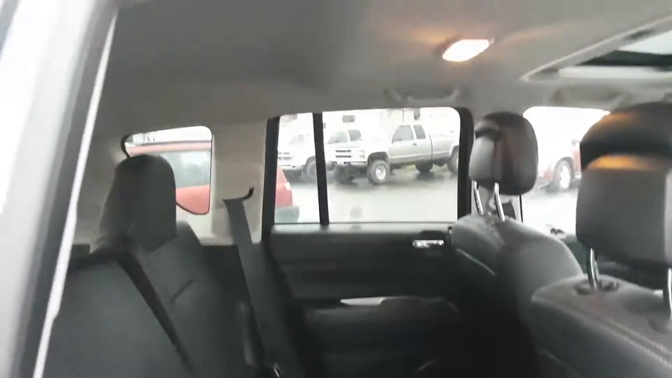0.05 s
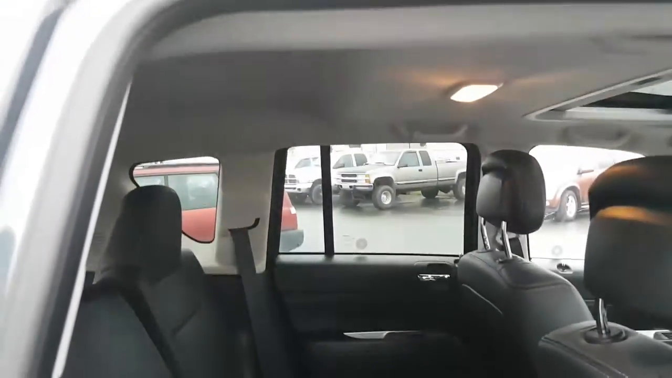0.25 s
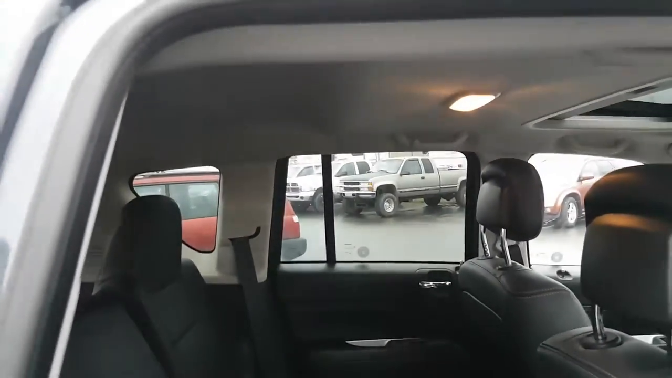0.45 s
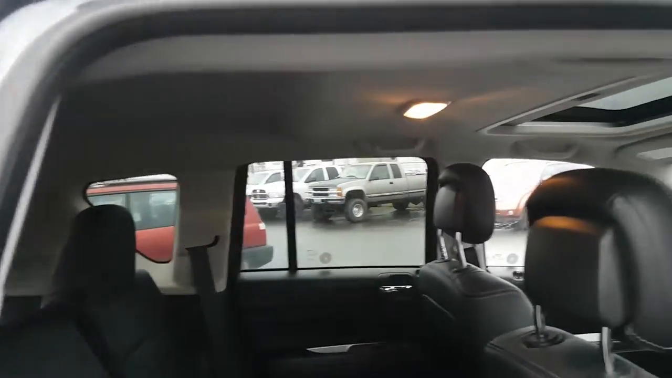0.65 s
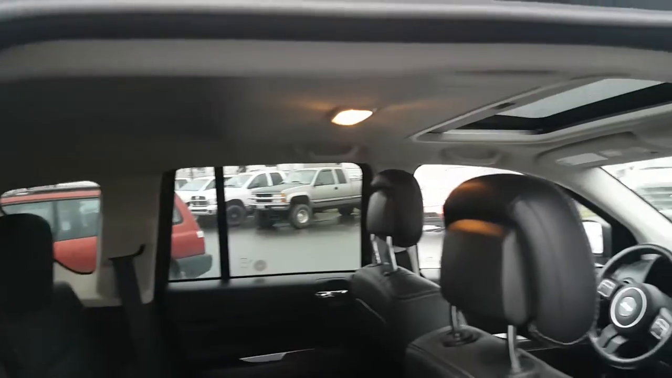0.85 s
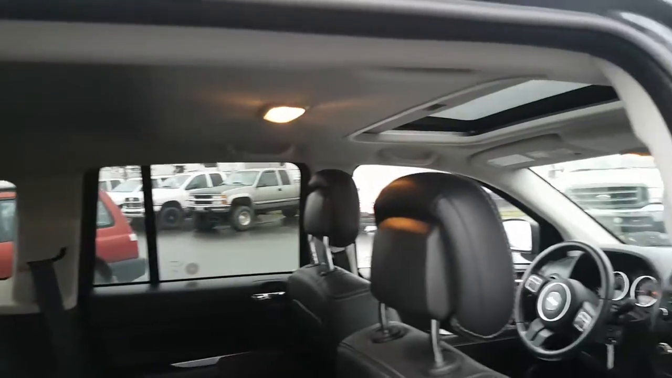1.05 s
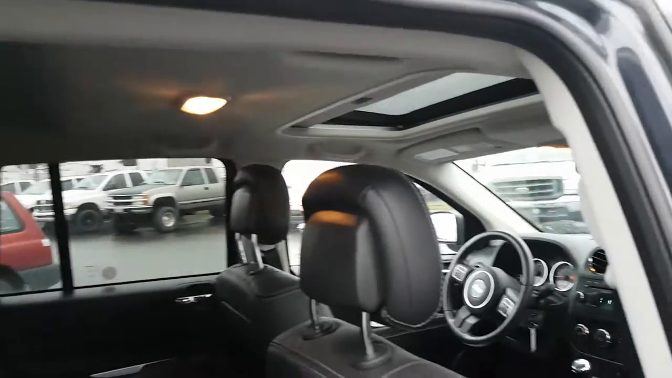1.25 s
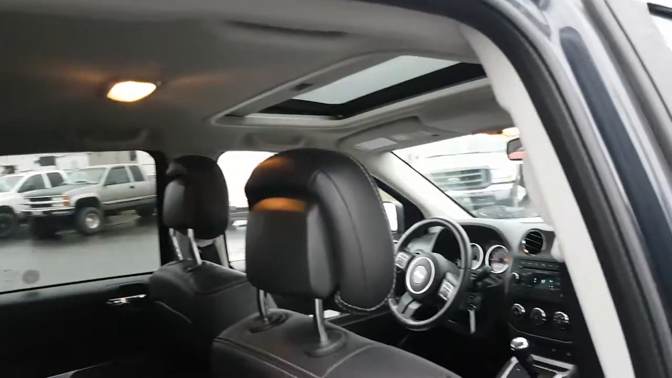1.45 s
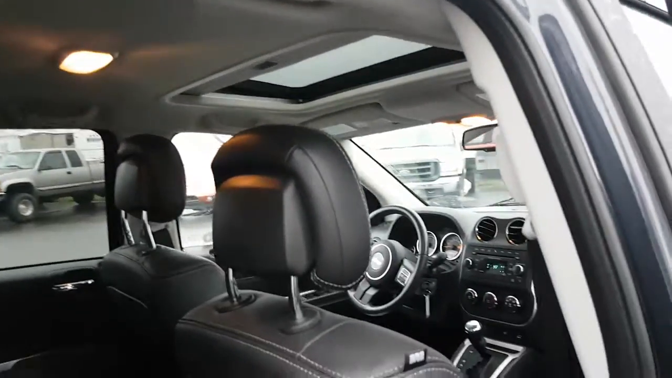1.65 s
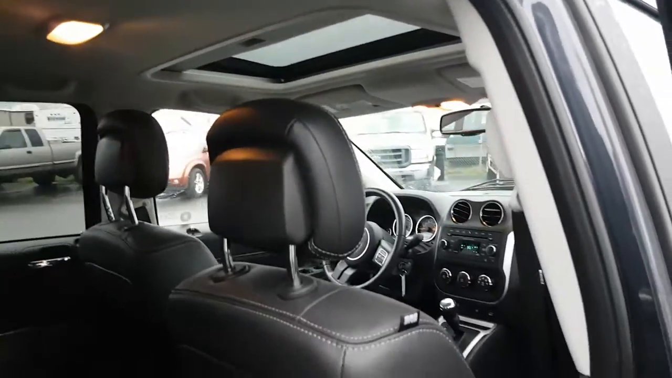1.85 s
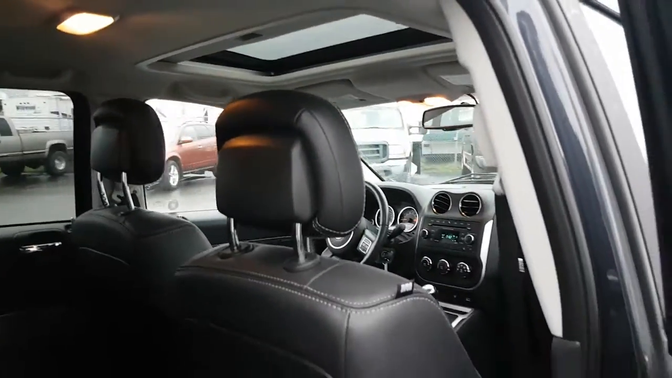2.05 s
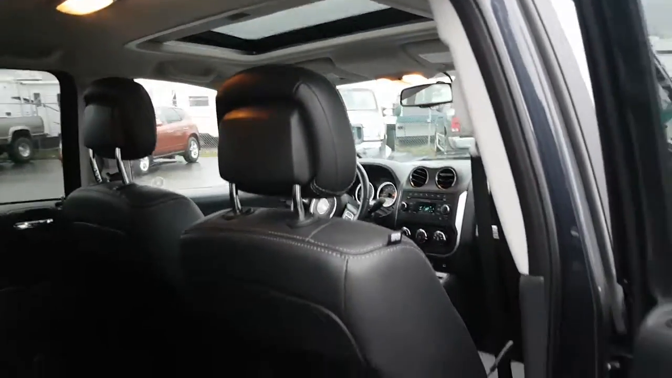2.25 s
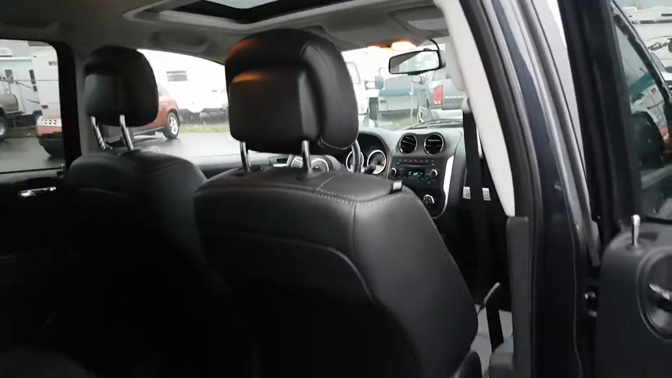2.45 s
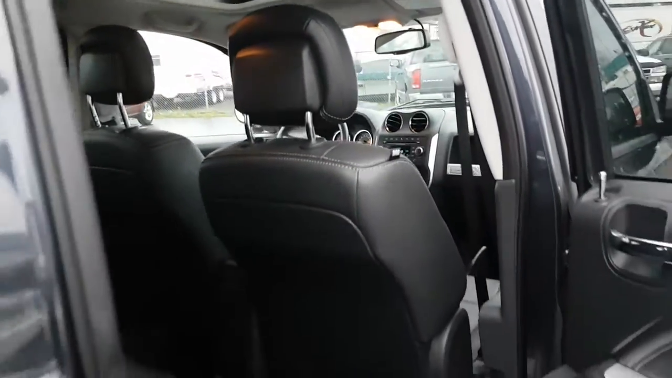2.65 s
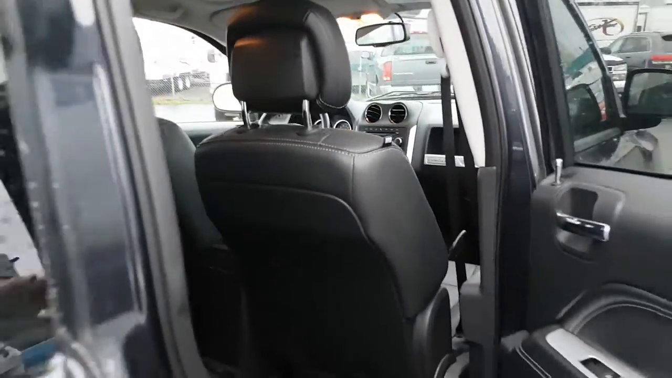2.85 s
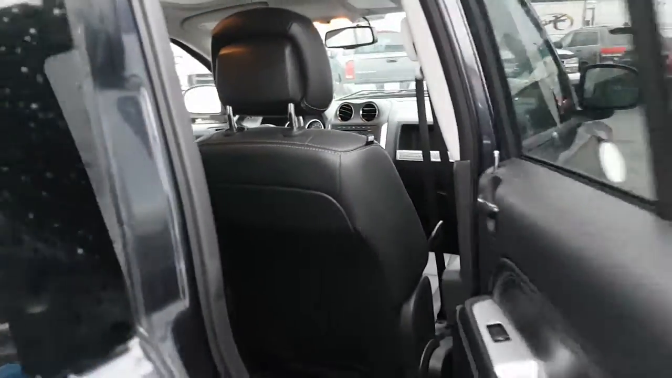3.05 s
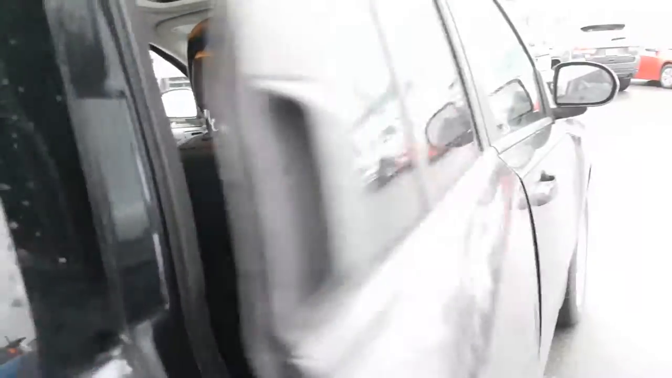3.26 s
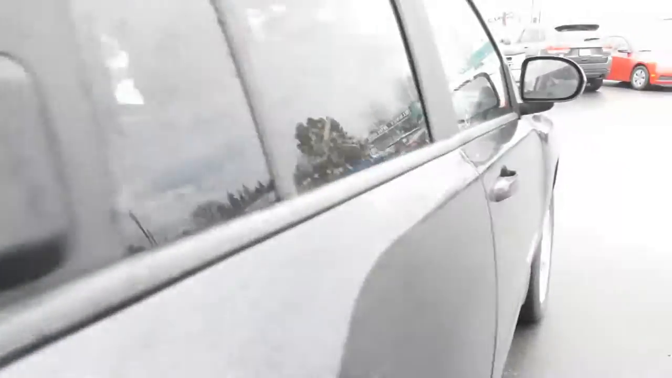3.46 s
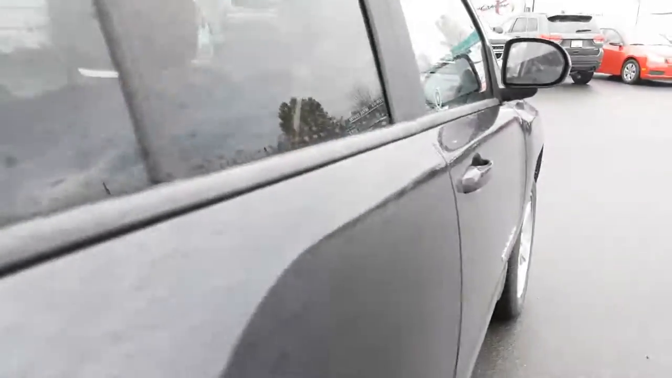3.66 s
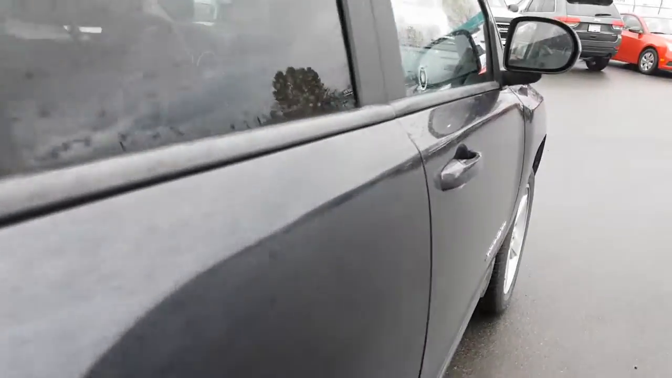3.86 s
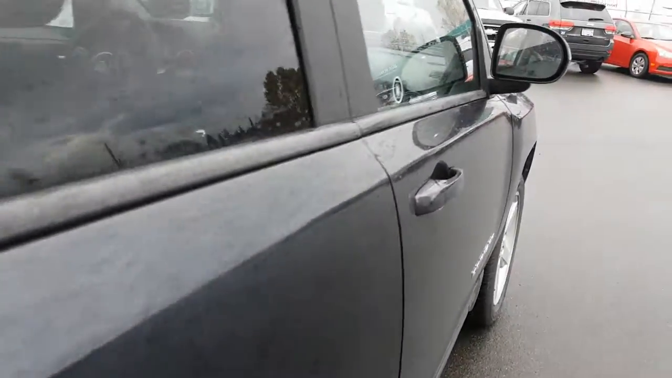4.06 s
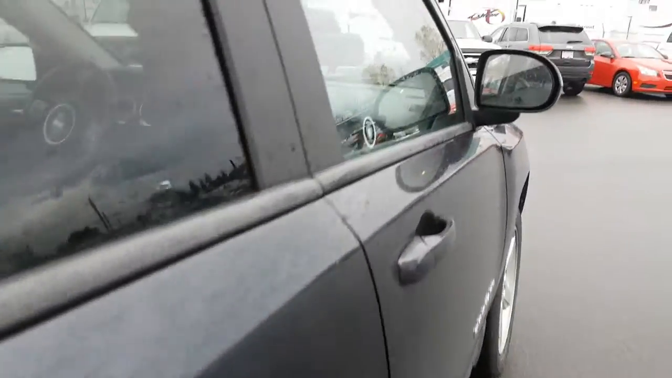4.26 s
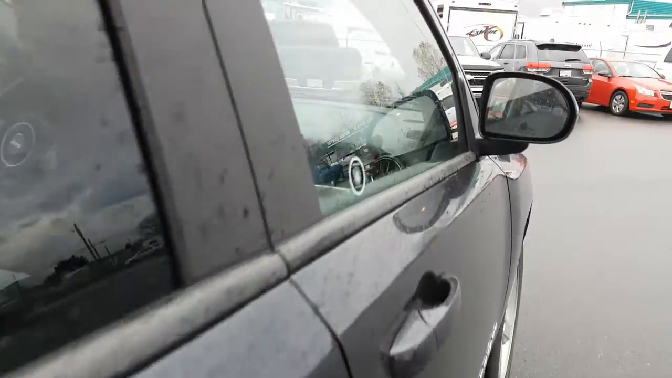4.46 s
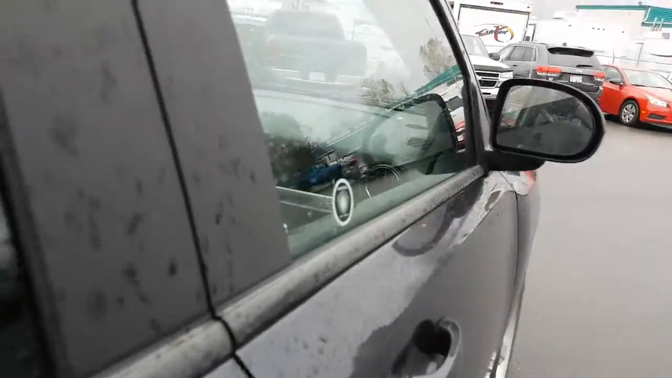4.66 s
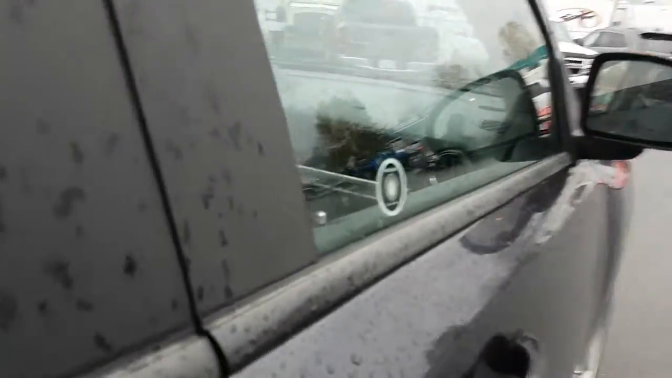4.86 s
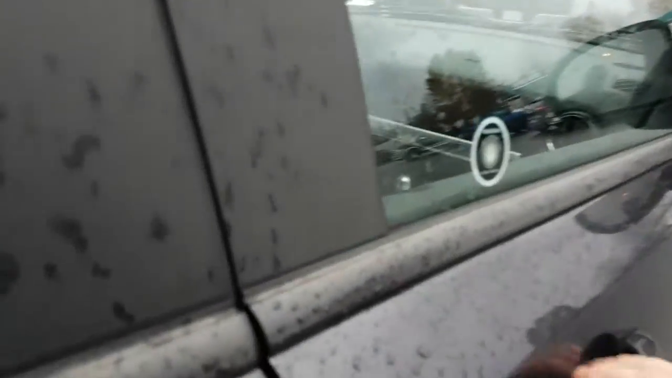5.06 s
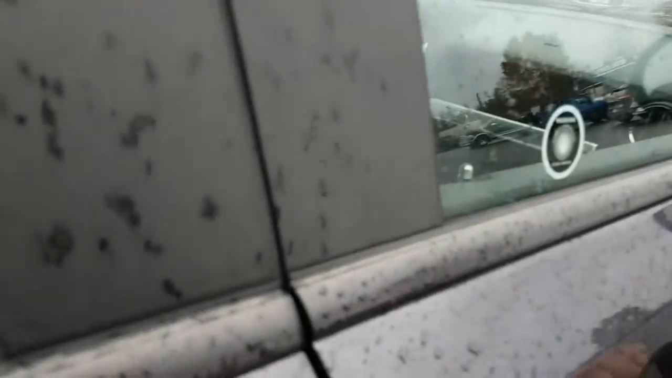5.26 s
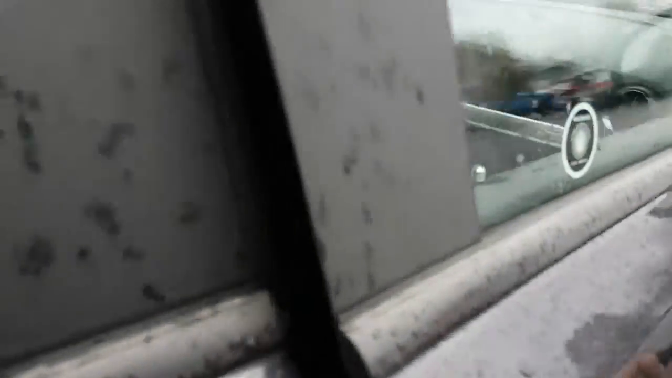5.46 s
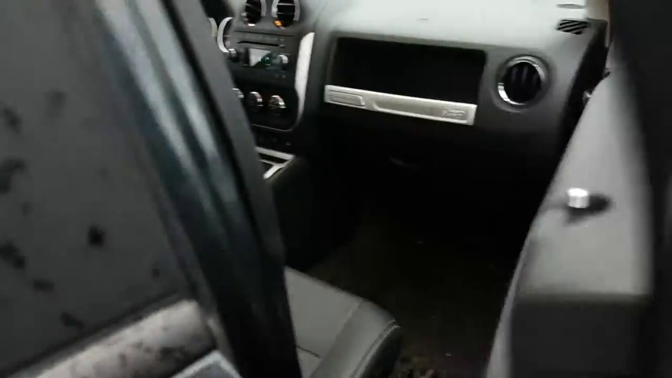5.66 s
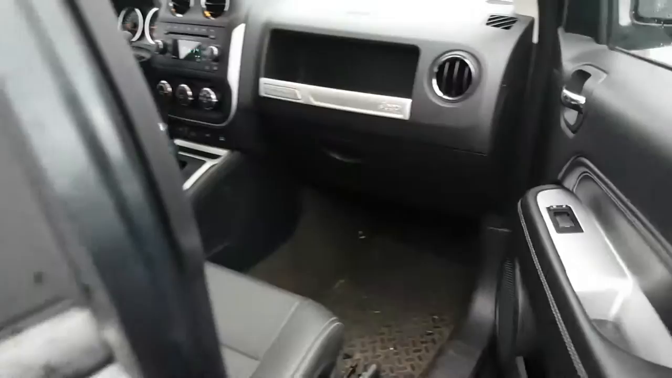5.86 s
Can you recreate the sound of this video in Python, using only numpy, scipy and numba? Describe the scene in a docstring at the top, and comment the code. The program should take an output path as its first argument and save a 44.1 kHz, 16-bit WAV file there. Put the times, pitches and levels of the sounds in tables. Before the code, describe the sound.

In a wet parking lot, faint engines and tyres murmur far off while light scuffs and ticks sound close by. A car door's hinge knocks dully, and the door slams with a loud, booming thump. After a brief bright rasp, another door's handle is pulled and its latch clunks open. Fingers bump the hand-held microphone at the end.

```python
"""A car's rear door is swung shut on a wet parking lot, an arm's length from a hand-held phone; then the
front door's handle is pulled and its latch springs open. Each blow booms in the body, rings the steel
skin and snaps the latch. Engines and tyres murmur far off and the open cabin hums. There are gritty
scuffs, short ticks and one bright double rasp like a lock or keys. Fingers bump the phone, and the slam
ducks the phone's gain."""
import sys
import numpy as np
from scipy import signal
from scipy.fft import rfft, irfft, next_fast_len
from scipy.io import wavfile
from scipy.ndimage import minimum_filter1d
from numba import njit

SR = 44100
rng = np.random.default_rng(int(sys.argv[2]) if len(sys.argv) > 2 else 0)


def generate_wav(signal):
    """Clip the signal to [-1, 1] and save it as 16-bit WAV at the path in sys.argv[1]."""
    frames = np.transpose(np.atleast_2d(signal))
    scaled = np.clip(frames, -1, 1) * 32767
    pcm = np.round(scaled).astype(np.int16)
    wavfile.write(sys.argv[1], SR, pcm)


N = 260471
SCENE_S = np.arange(N) / SR
RING_S = np.arange(int(0.45 * SR)) / SR  # time axis of one event


def undb(db):
    """Decibels to gain."""
    return 10 ** (np.asarray(db) / 20)


def unit(x):
    """Scale to rms 1."""
    return x / np.sqrt(np.mean(x ** 2))


def along(points, hz):
    """Read (f/Hz, value) points on a log-frequency axis."""
    f, value = np.transpose(points)
    return np.interp(np.log(hz + 1), np.log(f), value)


def bins(size):
    """FFT bin frequencies in Hz."""
    return np.fft.rfftfreq(size, 1 / SR)


def add(out, start_s, x):
    """Mix x in from start_s."""
    i = int(start_s * SR)
    out[:, i:i + x.shape[-1]] += x[..., :max(N - i, 0)]


def fade(t60_s):
    """Free decay, 60 dB down at t60_s."""
    return np.exp(-np.log(1000) * RING_S / t60_s)


def noise_pair(size, correlation):
    """White noise spectra at the two microphone ports."""
    mid, side = rfft(rng.standard_normal((2, size)))
    correlation = np.clip(correlation, -1, 1)
    return np.sqrt(1 + correlation) * mid + np.sqrt(1 - correlation) * side * np.array([[1], [-1]])


def band(spectrum, hz, half_oct, size):
    """Sound of a spectrum within half_oct either side of hz, rms 1."""
    ratio = (bins(size) + 1) / hz
    offset = (ratio - 1 / ratio) / (2 ** half_oct - 2 ** -half_oct)
    return unit(irfft(spectrum / np.sqrt(1 + offset ** 6), size))


def lot():
    """Distant engines and wet tyres; the bass is alike at both ports."""
    # background spectrum: f/Hz, relative density/dB
    colour = [(22, -27), (38, -16.5), (62, -1), (100, 0.5), (160, -4), (300, -9.5), (430, -14), (620, -13),
              (900, -18.5), (1800, -20), (2900, -25.5), (4400, -25), (6000, -39), (9000, -49), (15500, -46)]
    # from rear door to front, before offset and flutter: t/s, rumble/dB, tyre wash/dB, hiss/dB
    levels = [(0, -50, -60, -64.5), (1.2, -47.5, -55.5, -65.5), (2.6, -48.5, -57, -64.5),
              (3.3, -44, -55.5, -63.5), (4.55, -47, -56.5, -65.5), (5, -44, -53, -61.5),
              (5.8, -41.5, -57.5, -62.5)]
    times_s, *tracks_db = np.transpose(levels)
    size = next_fast_len(N, True)
    hz = bins(size)
    spectrum = noise_pair(size, 1.015 / (1 + (hz / 560) ** 2)) * undb(along(colour, hz))
    rumble = 1 / (1 + (hz / 450) ** 4)
    hiss = 1 - 1 / (1 + (hz / 2800) ** 6)
    shares = rumble, 1 - rumble - hiss, hiss
    out = 0
    for share, db, offset_db, flutter_db in zip(shares, tracks_db, (3, 4, 6), (1.5, 0.7, 0.4)):
        flutter = np.interp(SCENE_S * 14, np.arange(400), rng.standard_normal(400))  # 14 draws/s
        gain = undb(np.interp(SCENE_S, times_s, db) + offset_db + flutter_db * flutter)
        out += gain * unit(irfft(spectrum * share, size)[:, :N])
    return out


def cabin(hz=582, width_hz=134):
    """The open cabin resonates with outside noise until the phone is drawn back."""
    # hollow hum: t/s, level/dB
    levels = [(0, -55.5), (.5, -57), (1, -73), (1.5, -57), (2, -55), (2.4, -58.5), (2.9, -77)]
    size = next_fast_len(N, True)
    hum = band(noise_pair(size, 0.69), hz, np.log2(1 + width_hz / hz / 2), size)[:, :N]
    return hum * undb(np.interp(SCENE_S, *np.transpose(levels)))


def scuffs(grain_db=5, grains_per_s=1100, light_hz=3500):
    """Gritty scuffs and short ticks, with one bright double rasp like a lock or keys."""
    # scuffs, ticks and rasp: t/s, length/s, level/dB, centre f/Hz
    strokes = [(0.848, 0.043, -47.5, 2200), (0.907, 0.014, -43.5, 3100), (0.924, 0.029, -46, 3780),
               (1.054, .02, -53, 3200), (1.311, 0.016, -40.5, 1140), (1.496, 0.014, -54.5, 4760),
               (1.619, 0.033, -42, 1090), (1.68, 0.08, -43.5, 2330), (1.699, 0.012, -37, 2900),
               (2.062, 0.042, -48, 1800), (2.227, 0.054, -43.5, 3630), (2.32, 0.032, -50.5, 3950),
               (2.786, .06, -45, 3060), (2.865, 0.042, -43, 3400), (3.156, 0.034, -50, 4230),
               (4.303, .028, -43.5, 3480), (4.383, .037, -42.5, 3450), (4.801, 0.032, -37, 3320),
               (4.802, 0.059, -46.5, 10800), (4.826, 0.031, -38, 4050), (4.975, .15, -54, 3640),
               (5.099, .007, -53, 4500), (5.33, .05, -44, 2200), (5.716, 0.049, -53, 4160),
               (5.895, 0.055, -33.5, 1220)]
    out = np.zeros((2, N))
    size = len(RING_S)
    grain_index = (RING_S * grains_per_s).astype(int)
    for start_s, length_s, db, hz in strokes:
        half_oct = np.clip(0.38 + 0.85 * np.log2(light_hz / hz), 0.38, 1.11)  # wider below light_hz
        grains = undb(grain_db * np.clip(rng.standard_normal(size), -2, 2))[grain_index]
        grit = irfft(noise_pair(size, 0.25), size) * grains
        swell = np.sin(np.pi * np.minimum(RING_S / length_s, 1) ** 0.6)  # fast bite, slower release
        add(out, start_s, undb(db) * band(rfft(grit), hz, half_oct, size) * swell)
    return out


def thud(hz, t60_s, blur_db, crowded_hz=660):
    """Heavily damped resonance; above crowded_hz its tone gives way to a blur of close modes."""
    size = len(RING_S)
    tone = np.sin(2 * np.pi * hz * RING_S) / (1 + (hz / crowded_hz) ** 2)
    blur = band(rfft(rng.standard_normal(size)), hz, half_oct=0.48, size=size)
    onset = 1 - np.exp(-RING_S * hz / 0.11)
    return (tone + undb(blur_db) * blur) * onset * fade(t60_s)


def knocks():
    """Hinge stays drop off notches, the handle hits its stop, doors sway, feet land."""
    # dull knocks: t/s, f/Hz, level/dB
    hits = [(3.048, 528, -28.5), (3.056, 139, -29.5), (3.105, 84, -29), (3.129, 47.2, -26.5),
            (3.149, 122, -34), (4.44, 43.9, -41.5), (5.111, 134, -37), (5.358, 339, -15), (5.403, 440, -19),
            (5.408, 211, -16), (5.408, 1030, -13.5), (5.43, 90, -19.5), (5.5113, 607, -26),
            (5.5107, 950, -29), (5.61, 173, -37), (5.648, 970, -26.5)]
    out = np.zeros((2, N))
    for start_s, hz, db in hits:
        add(out, start_s, undb(db) * thud(hz, t60_s=0.21 * (130 / hz) ** 0.68, blur_db=-3))
    return out


def mode_ring(modes, t60_scale, scatter_db, detune):
    """Damped modes, neighbours in antiphase; level and pitch vary with the spot struck."""
    hz, db, t60_s = np.transpose(modes)[:, :, None]
    level_draw, pitch_draw = rng.standard_normal((2, len(modes), 1))
    tones = np.sin(2 * np.pi * hz * (1 + detune * pitch_draw) * RING_S)
    swings = undb(db + scatter_db * level_draw) * tones * fade(t60_scale * t60_s)
    return swings[::2].sum(0) - swings[1::2].sum(0)


def dense_ring(colour, decay, t60_scale, correlation):
    """Countless close modes as noise, each octave dying at its own rate."""
    size, lowest_hz = len(RING_S), 31.25
    spectrum = noise_pair(size, correlation) * undb(along(colour, bins(size)))
    spectrum /= irfft(spectrum, size).std()
    place_oct = np.log2(np.clip(bins(size), lowest_hz, 16000) / lowest_hz)
    out = 0
    for k in range(10):
        octave = irfft(spectrum * np.maximum(1 - abs(place_oct - k), 0), size)
        out += octave * fade(t60_scale * along(decay, lowest_hz * 2 ** k))
    return out


def soften(x, cutoff_hz):
    """Low-pass: a contact of finite length excites little above its cut-off."""
    return signal.sosfilt(signal.butter(2, min(cutoff_hz, SR / 3), fs=SR, output="sos"), x)


def steel_skin(t60_scale):
    """The struck skin rings, along with trim, glass and linkages."""
    # skin modes: f/Hz, relative level/dB, unscaled t60/s
    modes = [(240.2, -2.5, 0.24), (301.5, 0.5, 0.22), (423, -11, .16), (540, -13, 0.31),
             (648.4, -8.5, 0.077), (804, -11, 0.14), (870.6, -6.5, 0.22), (950, -18, 0.17),
             (1054, -0.5, 0.13), (1183, -5.5, 0.2), (1434, -9, 0.095), (1516, -6.5, 0.12), (1576, 1, .13),
             (1760, -7.5, 0.15), (2040, -8, 0.14), (2410, -2, 0.076)]
    # trim spectrum: f/Hz, relative density/dB
    trim_colour = [(60, -24), (200, -2.5), (450, -2.5), (900, 3), (1600, -4.5), (3000, -14.5), (6000, -14),
                   (15000, -35.5)]
    # trim decay: f/Hz, unscaled t60/s
    trim_decay = [(100, 0.6), (500, 0.13), (1500, 0.077), (4000, 0.27), (15000, 0.069)]
    panel = mode_ring(modes, t60_scale, scatter_db=0.5, detune=0.0016)
    trim = dense_ring(trim_colour, trim_decay, t60_scale, correlation=0.78)
    return undb(-7) * panel + undb(-1) * trim


def latch_snap(t60_scale, crack_s=0.00099, rise_s=0.0012):
    """Metal on metal: a hard crack, then the linkage rings on."""
    # snap spectrum: f/Hz, relative density/dB
    colour = [(300, -19), (1200, -2.5), (2500, -3), (4200, 1.5), (5500, -2.5), (7400, -6), (8600, -14),
              (10300, -6), (13000, -7.5), (15500, -15.5)]
    # snap decay: f/Hz, unscaled t60/s
    decay = [(1000, 0.048), (5000, 0.07), (15000, 0.034)]
    crack = 1 + 0.69 * np.exp(-RING_S / crack_s)
    onset = 1 - np.exp(-RING_S / rise_s)
    return dense_ring(colour, decay, t60_scale, correlation=0.32) * crack * onset


def rebounds(first_s=3.456, gap_s=0.0172, softening=0.78, count=5):
    """Blows of the slammed door chattering on its seal, each weaker and duller."""
    # first rebound: body/dB, skin/dB, latch/dB, contact cut-off/Hz
    first = (-16.5, -14.5, -28.5, 1699)
    # loss per rebound: body/dB, skin/dB, latch/dB
    loss_db = (3, 3.5, 5.5)
    *levels_db, contact_hz = first
    return [(first_s + k * gap_s, *(levels_db - k * np.array(loss_db)), contact_hz * softening ** k)
            for k in range(count)]


def doors(latched_s=3.482, free_scale=0.96, held_scale=0.61):
    """Catch, striker and rebounds drive body, skin and latch; from latched_s the seals damp the ring."""
    # door blows: t/s, body/dB, skin/dB, latch/dB, contact cut-off/Hz
    blows = [(3.415, -31.5, -6, -42, 1850), (3.421, -26, -12, -18, 1700), (3.4289, -6, -5.5, -12.5, 2220),
             (3.4383, -11, -26, -19, 2400), (3.4903, -14.5, -24, -19.5, 1510),
             (5.3573, -24, -16.5, -26, 1300), (5.401, -39, -24, -24.5, 3000), (5.402, -20, -12, -22, 1700),
             (5.408, -20.5, -11.5, -37, 1950), (5.4339, -19, -24.5, -28, 1100)]
    # hollow door modes: f/Hz, relative level/dB, unscaled t60/s
    body_modes = [(86.5, 0, 0.28), (137.5, -0.5, 0.23), (170.2, -2, .23), (231.4, -5.5, 0.18),
                  (299.3, 1.5, 0.15)]
    # seal closing or parting, pumping the cabin air: t/s, level/dB
    pumps = [(3.4376, -4.5), (3.456, -15), (5.4354, -23)]
    # cabin air modes: f/Hz, relative level/dB, unscaled t60/s
    air_modes = [(35.9, -13.5, 0.92), (61.7, 1.5, 0.24)]
    out = np.zeros((2, N))
    push = 1 - np.exp(-RING_S / 0.0016)  # rubber takes up the load gradually
    for start_s, body_db, skin_db, latch_db, contact_hz in blows + rebounds():
        t60_scale = free_scale if start_s < latched_s else held_scale
        boom = mode_ring(body_modes, t60_scale, scatter_db=5, detune=0.01) * push
        skin = soften(steel_skin(t60_scale), contact_hz)
        snap = soften(latch_snap(t60_scale), 5.1 * contact_hz)
        add(out, start_s, undb(body_db) * boom + undb(skin_db) * skin + undb(latch_db) * snap)
    for start_s, db in pumps:
        t60_scale = free_scale if start_s < latched_s else held_scale
        air = mode_ring(air_modes, t60_scale, scatter_db=-0.5, detune=0.012) * push
        add(out, start_s, undb(db) * air)
    return out


def pawl(release_s=5.4035, db=-21):
    """The front latch's pawl flies open and rings."""
    # pawl modes: f/Hz, relative level/dB, unscaled t60/s
    modes = [(1244, -5, 0.094), (1510, 1, 0.077), (1641, 3.5, 0.076), (2230, -11, 0.05),
             (2750, -2.5, 0.041), (3390, 0.5, 0.041), (3900, -3.5, .04)]
    out = np.zeros((2, N))
    add(out, release_s, undb(db) * mode_ring(modes, t60_scale=0.74, scatter_db=3, detune=0.003))
    return out


def fingers(left_db=-11.5):
    """Bumps beside the right port cross the phone's case and reach the left port weaker."""
    # finger bumps: t/s, f/Hz, level/dB
    bumps = [(5.816, 118, -15), (5.82, 186, -19), (5.851, 168, -17), (5.862, 89, -8.5), (5.88, 123, -7.5),
             (5.889, 192, -6), (5.889, 502, -20)]
    out = np.zeros((2, N))
    for start_s, hz, db in bumps:
        add(out, start_s, undb([[db + left_db], [db]]) * thud(hz, t60_s=0.086, blur_db=0))
    return out


def on_right(x, colour, lag_s):
    """Colour and delay the right channel only."""
    size = next_fast_len(N + 100, True)
    hz = bins(size)
    response = undb(along(colour, hz)) * np.exp(-2j * np.pi * hz * lag_s)
    return np.array([x[0], irfft(rfft(x[1], size) * response, size)[:N]])


@njit
def follow(target, attack, recovery):
    """Ease up towards the target; fall back at a constant rate."""
    out, now = np.empty(len(target)), 0.
    for i in range(len(target)):
        gap = target[i] - now
        now += gap * attack if gap >= 0 else max(gap, -recovery)
        out[i] = now
    return out


def gain_control(x, threshold_db=-15, slope=4.9, depth_db=12.5):
    """Level over the threshold pulls the gain down; it holds, then creeps back."""
    window_s, attack_s, hold_s, recovery_db_per_s = 0.066, 0.19, 0.5, 35
    window = window_s * SR
    power = signal.lfilter([1.0], [1, -np.exp(-1 / window)], x.mean(0) ** 2) / window
    cut_db = np.clip(slope * (10 * np.log10(power + 1e-12) - threshold_db), 0, depth_db)
    half_hold = int(hold_s * SR / 2)
    held_db = -minimum_filter1d(-cut_db, 2 * half_hold + 1, origin=half_hold, mode="constant")
    return x * undb(-follow(held_db, 1 / (attack_s * SR), recovery_db_per_s / SR))


def scene():
    """Doors and footwork close on the left, fingers on the case, the lot all round."""
    # phone's shadow on the right port: f/Hz, gain/dB
    shadow = [(100, -1.5), (380, 0.5), (800, -2.5), (1300, -7.5), (2300, -3.5), (3500, -10), (6000, -5),
              (9000, -15.5), (14000, -20)]
    near = doors() + pawl() + knocks() + scuffs()
    return on_right(near, shadow, lag_s=0.00036) + fingers() + lot() + cabin()


def record(dry):
    """The phone colours the right channel, rides its gain, rounds off peaks and cuts the top."""
    # right port's narrow duct, relative to the left: f/Hz, gain/dB
    duct = [(400, 0.5), (700, -1.5), (1300, -3.5), (2250, 3.5), (2800, -3.5), (3450, -13), (4300, -5.5),
            (5400, -11), (7000, -9.5), (8500, 0.5), (11000, -3), (15000, -0.5)]
    top_hz = 15750
    ducked = gain_control(on_right(dry, duct, lag_s=0))
    rounded = ducked / (1 + ducked ** 6) ** (1 / 6)
    return signal.sosfilt(signal.ellip(10, 0.2, 70, top_hz, fs=SR, output="sos"), rounded)


dry = scene()
out = record(dry)
generate_wav(out)
```